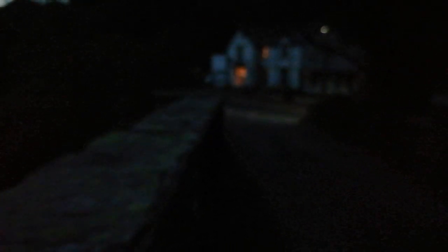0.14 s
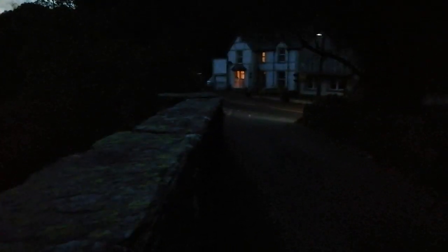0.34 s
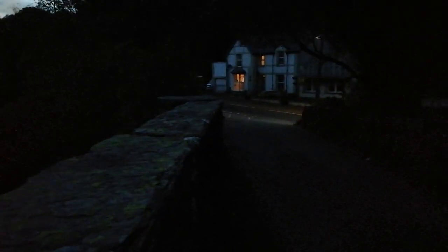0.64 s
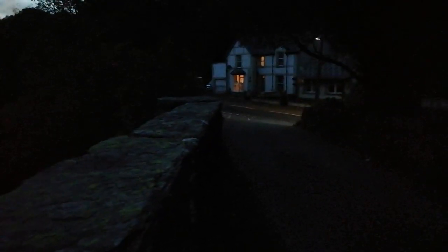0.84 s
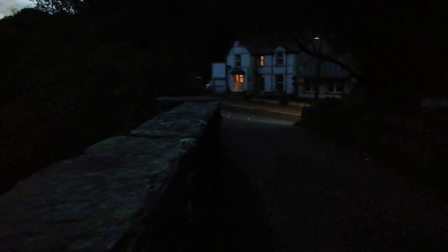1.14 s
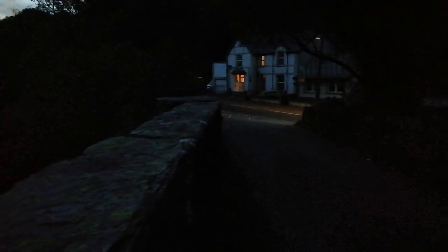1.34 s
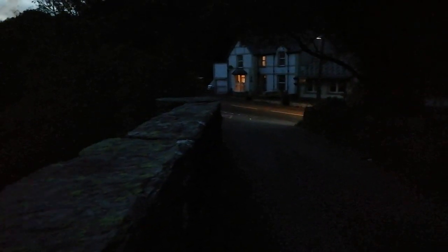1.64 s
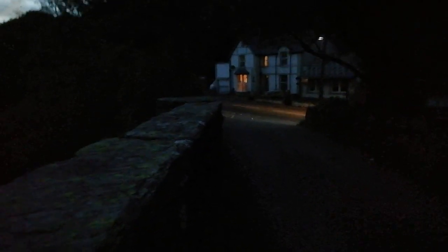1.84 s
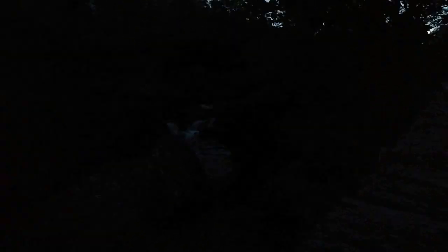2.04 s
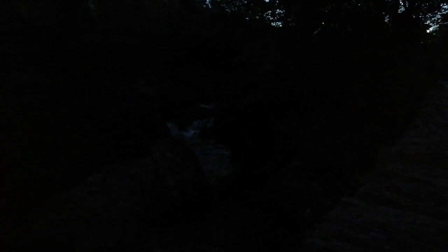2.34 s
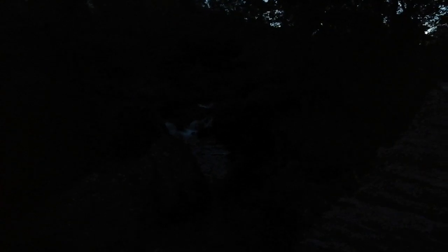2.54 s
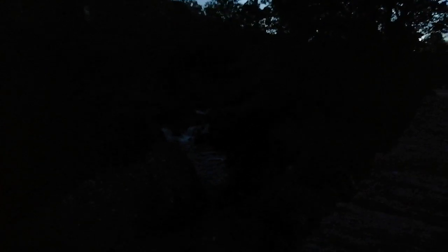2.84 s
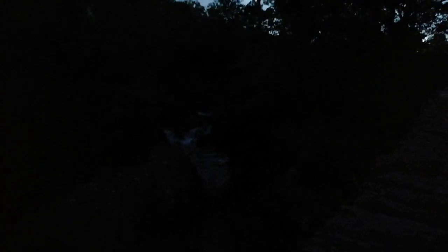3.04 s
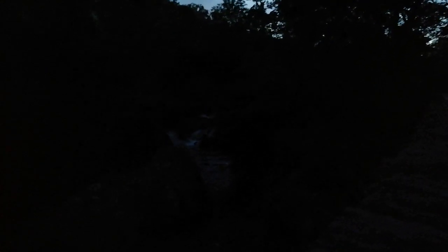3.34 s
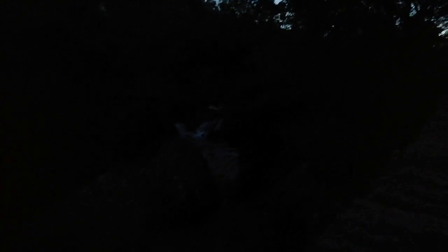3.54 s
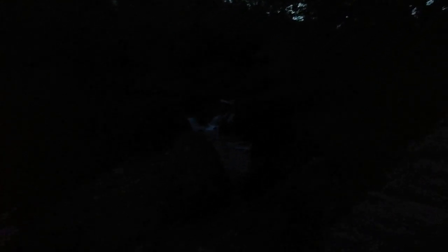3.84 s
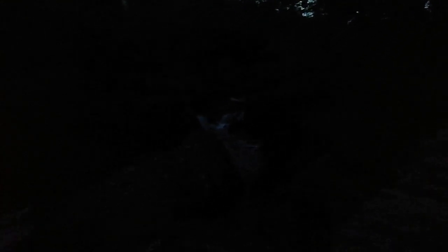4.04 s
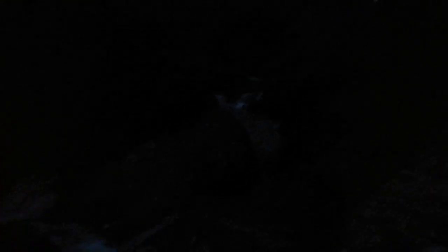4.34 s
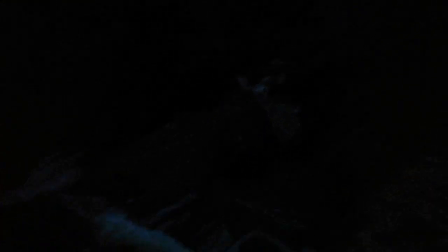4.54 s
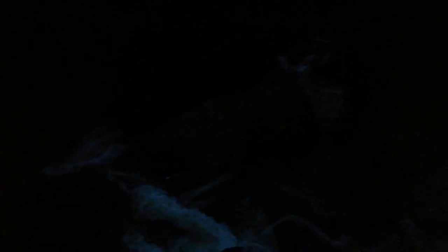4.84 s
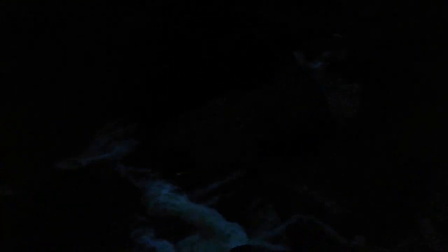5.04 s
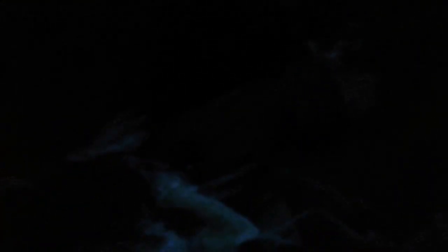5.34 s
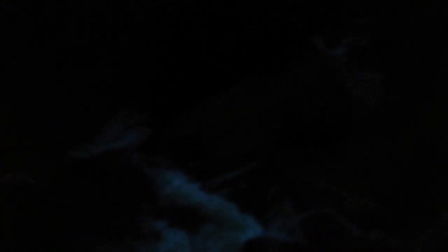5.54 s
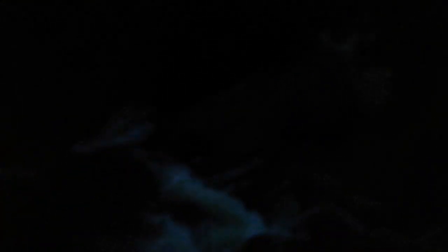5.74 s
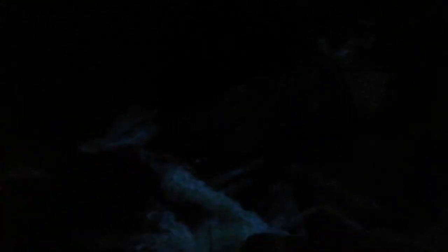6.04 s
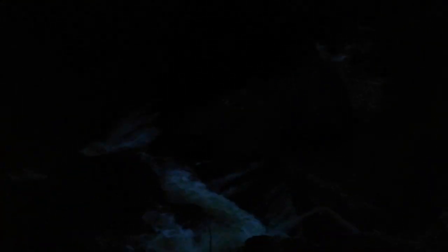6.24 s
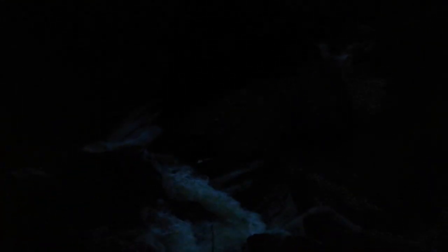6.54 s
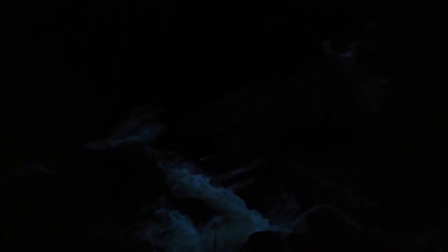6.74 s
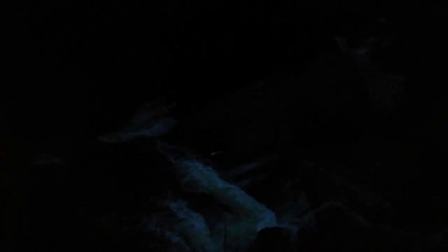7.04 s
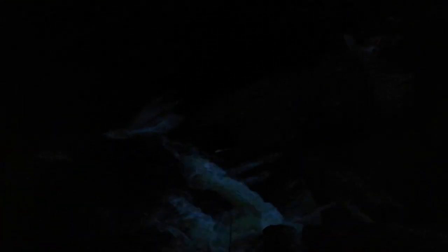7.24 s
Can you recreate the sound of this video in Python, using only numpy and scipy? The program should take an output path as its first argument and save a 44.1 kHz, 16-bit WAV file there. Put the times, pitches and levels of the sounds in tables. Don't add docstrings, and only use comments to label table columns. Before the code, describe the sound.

A rocky river rushes in a constant roaring wash, brightening after a scene change as the view turns upstream, with small finger knocks on the camera.

```python
import sys
import numpy as np
from scipy import signal
from scipy.io import wavfile
from scipy.ndimage import uniform_filter1d

SR = 44100
rng = np.random.default_rng(int(sys.argv[2]) if len(sys.argv) > 2 else 0)


def to_linear_factor(level_db):
    exponent = np.asarray(level_db, float) / 20
    return 10 ** exponent


def master(y):
    cut = np.clip(np.atleast_2d(y).T, -1, 1)
    pcm = np.round(cut * 32767)
    wavfile.write(sys.argv[1], SR, pcm.astype(np.int16))


N = 325458
POSES_OF_THREE = (0, 1, 4)


def evened(x):
    return x / np.sqrt(np.mean(x ** 2) + 1e-20)


def read(points, hz):
    f, *values = np.transpose(points)
    return [np.interp(np.log(hz + 1), np.log(f + 1), v) for v in values]


def rise(hz, edge_hz, power):
    return hz ** power / (hz ** power + edge_hz ** power)


def blend(shapes, poses, pose):
    weights = [np.interp(pose, poses, one) for one in np.eye(len(poses))]
    return np.transpose(shapes) @ np.array(weights)


def add(mix, s, sound):
    part = mix[round(s * SR):][:len(sound)]
    part += sound[:len(part)]


def knocks():
    # t/s, right tick level/dB, thump level/dB, thump f/Hz, signed strength
    taps = [
        (1.6165, -40, -25, 212, -1.2),
        (1.8871, -9, -29, 170, 0.9),
        (1.898, -26, -24, 200, 0.74),
        (2.307, -40, -18, 322, 0.83),
        (6.975, -34, -17.5, 198, 0.91),
    ]
    out, t = np.zeros((2, N)), np.arange(600) / SR
    push_s = 0.00024
    ring = np.exp(-t / 0.0012) * np.cos(2 * np.pi * 1600 * (t - 0.00036))
    tick = (t < push_s) - 0.62 * ring * (t >= push_s)
    tick = signal.lfilter(*signal.butter(2, 7000, fs=SR), tick)
    for s, tick_db, thump_db, hz, sign in taps:
        thump = sign * to_linear_factor(thump_db) * np.cos(2 * np.pi * hz * t - 0.6) * np.exp(-t * hz * 1.3)
        thump *= 1 - np.exp(-t / 0.00018)
        add(out[0], s + 0.00047, thump)
        add(out[1], s, thump + sign * to_linear_factor(tick_db) * tick)
    return out


def froth(bubbles_db, per_s, spread_db):
    bubbles, t = np.zeros(N), np.arange(1500) / SR
    size = to_linear_factor(spread_db * np.minimum(rng.exponential(1, N), 5))
    size *= rng.random(N) < per_s / SR
    kind = rng.integers(0, 12, N)
    for k, hz in enumerate(np.geomspace(300, 6000, num=12)):
        turns = hz * t
        chirp = np.sin(2 * np.pi * turns * (1 + 0.029 * turns)) * turns * np.exp(-turns / 1.4)
        bubbles += signal.oaconvolve(size * (kind == k), hz * chirp)[:N]
    return evened(rng.standard_normal(N) + to_linear_factor(bubbles_db) * evened(bubbles))


def surges(hz, frames):
    patches = rng.standard_normal((frames, len(hz))).T
    patches = uniform_filter1d(patches, size=24, axis=0)
    patches = evened(uniform_filter1d(patches, size=12, axis=1))
    t = np.arange(frames) * 256 / SR
    rates_hz = np.geomspace(0.5, 10, 30)
    surge = evened(sum(np.sin(2 * np.pi * (f * t + rng.random())) / np.sqrt(f) for f in rates_hz))
    fizz = rise(hz, 9500.0, 2)[:, None]
    body = rise(hz, 330.0, 1)[:, None]
    return fizz * (0.81 * patches + 0.4 * surge) + 0.1 * surge * body


def splashes(t):
    # t/s, flow level/dB, spray level above the port ring/dB
    waves = [
        (2.36, 1.8, 0.5),
        (2.55, 0.9, 4),
        (2.85, 0.7, 1),
        (2.98, 0.8, 2),
        (3.1, -1, 3.5),
        (3.8, .2, -2),
    ]
    half_length_s = 0.062
    s, *columns = np.transpose(waves)
    return np.array(columns) @ np.exp(-((t - s[:, None]) / half_length_s) ** 2)


def hollow(hz, pose):
    # pose, centre f/Hz, half width f/Hz, level/dB
    notches = [(0, 4180, 423, -6), (1, 4840, 950, -7.5), (1.5, 5100, 850, -5.5), (2, 5240, 700, -4),
               (3, 5440, 700, -3.5), (4, 5200, 800, -1.5)]
    poses, *columns = np.transpose(notches)
    notch_hz, width, db = (np.interp(pose, poses, c) for c in columns)
    return db * np.exp(-((hz[:, None] - notch_hz) / width) ** 2)


def heard(table, ring, echo, hz):
    # f/Hz, level/dB
    roar = [(10, -18), (25, -21), (55, -4.5), (95, -.5), (160, -0.65), (250, 0), (13800, -0.04),
            (15800, -2.5)]
    ring_hz, width, db = ring
    lift = 1 + to_linear_factor(2 * db) / (1 + ((hz - ring_hz) / width) ** 2) ** 1.4
    dip_hz, spacing_hz, share, end_hz = echo
    share = np.clip(share, 0, 0.9) * np.exp(-(hz / end_hz) ** 2)
    turns = (np.maximum(hz, table[0][0]) - dip_hz) / spacing_hz
    comb = 1 - 2 * share / (1 + share ** 2) * np.cos(2 * np.pi * turns)
    return read(table, hz)[0] + read(roar, hz)[0] + 10 * np.log10(lift * comb)


def left_port(hz, pose):
    # f/Hz, level per Hz/dB
    bodies = [
        [(250, -62), (590, -66), (1000, -69), (2500, -74), (5410, -75), (7540, -69.5), (8910, -75.5),
         (15500, -90.5)],
        [(250, -61), (940, -65), (1600, -68.5), (5410, -71), (7970, -66.5), (9410, -69), (10810, -81),
         (15500, -93)],
        [(250, -62), (940, -68), (2200, -70.5), (5720, -71.5), (7760, -69.5), (9160, -67.5), (10810, -78.5),
         (15500, -100)],
    ]
    # f/Hz, half width f/Hz, level/dB
    rings = [(8400, 470, 10.4), (8500, 520, 7.9), (8470, 370, 10)]
    # first dip f/Hz, dip spacing f/Hz, share, dies above f/Hz
    echoes = [(456, 960, 0.35, 3200), (600, 980, 0.69, 2000), (570, 920, 0.61, 1400)]
    return blend([heard(*parts, hz) for parts in zip(bodies, rings, echoes)], POSES_OF_THREE, pose)


def right_port(hz, pose):
    # f/Hz, level per Hz/dB
    bodies = [
        [(250, -64), (800, -68.5), (1600, -62), (3000, -67), (6570, -66), (7970, -67.5), (10810, -85),
         (15500, -102)],
        [(250, -61.5), (940, -65), (1320, -60.5), (1900, -60.5), (6570, -62), (8200, -59), (10230, -68.5),
         (15500, -87)],
        [(250, -57), (1120, -62.5), (1890, -57), (3200, -61), (6570, -60), (7540, -57), (10500, -70),
         (15500, -84)],
        [(250, -63), (1740, -61.5), (2560, -63.5), (3990, -62.5), (6940, -63), (9160, -67), (10520, -75),
         (15500, -79)],
        [(250, -63), (1750, -60.5), (2200, -62), (3570, -61.5), (7200, -59.5), (9410, -64), (10810, -77),
         (15500, -80)],
    ]
    # f/Hz, half width f/Hz, level/dB
    rings = [(8350, 450, -30), (8350, 450, -30), (8350, 450, -30), (8320, 670, 11), (8280, 540, 9.5)]
    # first dip f/Hz, dip spacing f/Hz, share, dies above f/Hz
    echoes = [(604, 1040, 0.47, 930), (604, 670, 1, 1100), (553, 1540, 0.79, 940), (605, 850, 1, 720),
              (520, 620, 1, 430)]
    shapes = [heard(*parts, hz) for parts in zip(bodies, rings, echoes)]
    return blend(shapes, range(len(shapes)), pose) + hollow(hz, pose)


def likeness(hz, pose):
    # f/Hz, in-phase part, quarter-turn part
    alike_tables = [
        [(110, 1, 0.041), (338, 0.61, -.92), (590, -0.49, -0.81), (1180, -.05, -0.63), (1620, -0.38, 1),
         (2000, 0.094, 0.79), (2720, .01, -.38), (3600, -0.075, -0.1)],
        [(220, 0.97, 0.055), (340, 0.89, -0.16), (580, -0.31, -.22), (790, 0.19, -0.89), (1150, 0.68, -0.52),
         (1500, 0.24, -0.22), (2040, -0.15, -0.15), (2450, -0.086, -0.5)],
        [(220, 0.98, 0.036), (380, 0.71, 0.042), (538, -0.95, 0.34), (700, 0.28, -0.26), (900, .5, -.05),
         (1490, 0.58, -0.056), (2570, -0.37, -.03), (2900, 0.16, 0.15)],
    ]
    alike_ends = [4100, 2900, 4100]
    # right lag t/ms, share, phase/rad
    treble_paths = [
        [(-0.499, 0.036, 5.1), (0.595, 0.048, 3.5)],
        [(-0.505, 0.1, 2.6), (0.176, 0.065, 1.8)],
        [(-0.499, 0.11, 2.36), (0.034, 0.03, 1.03)],
    ]
    alike = []
    for table, end_hz, paths in zip(alike_tables, alike_ends, treble_paths):
        in_phase, quarter_turn = read(table, hz)
        one = (in_phase + 1j * quarter_turn) / (1 + (hz / end_hz) ** 10)
        for ms, share, phase in paths:
            one = one + rise(hz, 2600.0, 2) * share * np.exp(1j * (phase - 2 * np.pi * hz * ms / 1000))
        alike.append(one)
    road, parapet, tipped = alike
    same = blend([road, parapet, parapet, tipped], (0, 1, 3, 4), pose)
    deep = rise(hz, 90.0, 4)[:, None]
    same = deep * same + 1 - deep
    return same / np.maximum(abs(same), 1)


def river():
    # t/s, pose
    turn_path = [
        (2.1, 1.13),
        (2.35, 1.05),
        (2.55, 2.26),
        (2.82, 1.9),
        (3.05, 2.7),
        (3.5, 2.96),
        (4.4, 3.65),
        (4.8, 4.2),
    ]
    change_s, change_fade_s = 1.977, 0.002
    parapet_flow_db, road_roar_db = -0.34, 4
    hz, t, near = signal.stft(froth(-15.0, per_s=1400, spread_db=3.0), SR, nperseg=1024, noverlap=768)
    other = signal.stft(froth(-16.0, per_s=1500, spread_db=1.5), SR, nperseg=1024, noverlap=768)[2]
    churn_left, churn_right = surges(hz, len(t)), surges(hz, len(t))
    turning = np.interp(t, *np.transpose(turn_path))
    flow_db, spray_db = splashes(t)
    deep, low, high = (rise(hz, edge_hz, 4)[:, None] for edge_hz in (90.0, 400.0, 10000.0))
    facing_river_db = low * (parapet_flow_db + flow_db) + high * spray_db
    road = (0 * t, 0, (1 - deep) * road_roar_db)
    parapet = (np.clip(turning, 1, 4), facing_river_db, 0)
    views = []
    for pose, facing_db, both_db in (road, parapet):
        same = likeness(hz, pose)
        right = same * near + np.sqrt(1 - np.minimum(abs(same) ** 2, 1)) * other
        left_db = left_port(hz, pose) + churn_left
        right_db = right_port(hz, pose) + churn_right + facing_db
        z = np.array([near * to_linear_factor(left_db), right * to_linear_factor(right_db)]) * to_linear_factor(both_db)
        views.append(signal.istft(z, nperseg=1024, noverlap=768)[1][:, :N] * np.sqrt(SR / 2))
    fade = np.clip((np.arange(N) / SR - change_s) / change_fade_s + 0.5, 0, 1)
    return views[0] * (1 - fade) + views[1] * fade


def scene():
    return knocks() + river()


def band_limit(x):
    return signal.sosfilt(signal.butter(12, 15810, fs=SR, output="sos"), x)


def record(dry):
    return band_limit(dry)


dry = scene()
out = record(dry)
master(out)
```